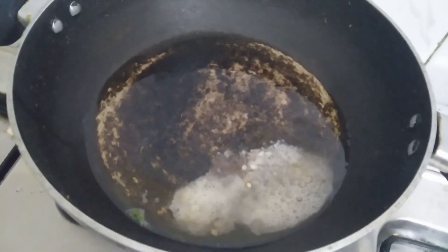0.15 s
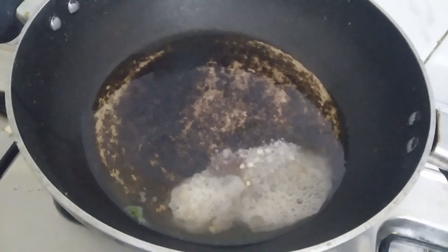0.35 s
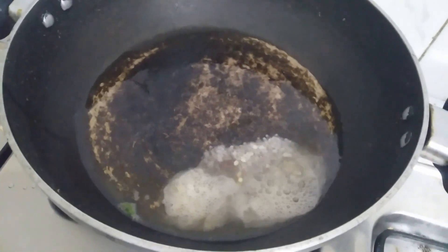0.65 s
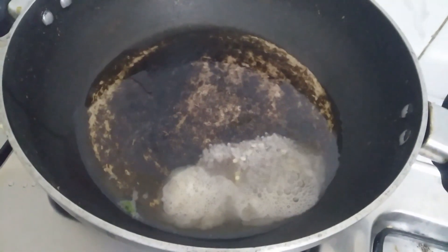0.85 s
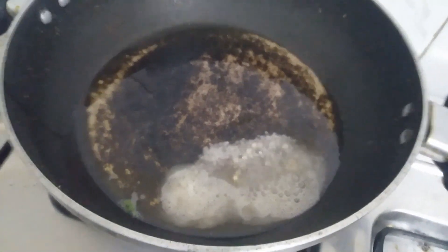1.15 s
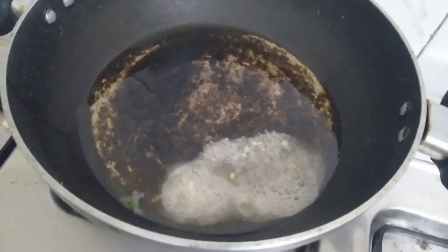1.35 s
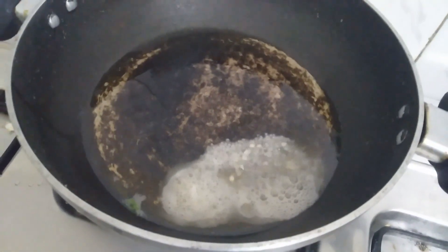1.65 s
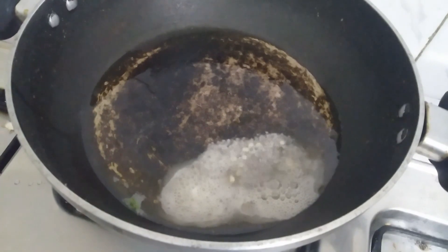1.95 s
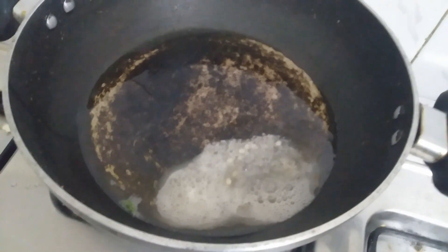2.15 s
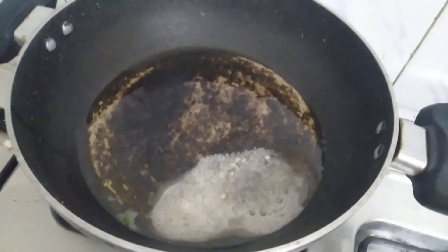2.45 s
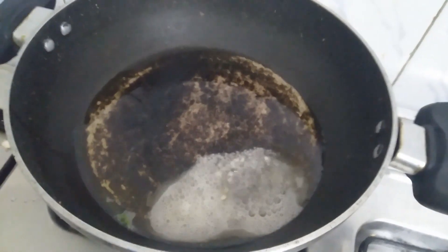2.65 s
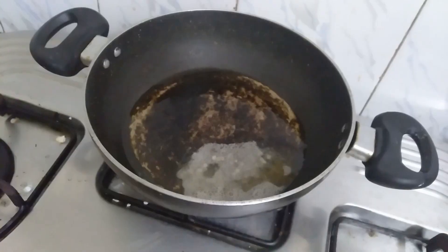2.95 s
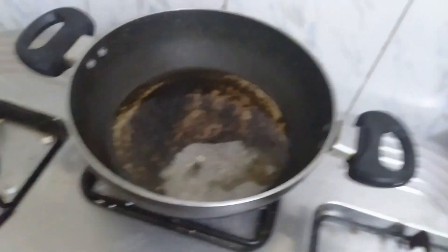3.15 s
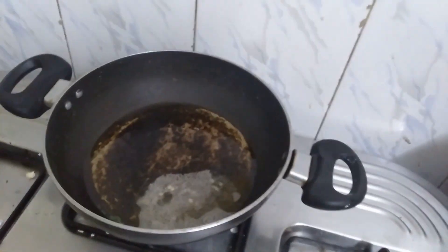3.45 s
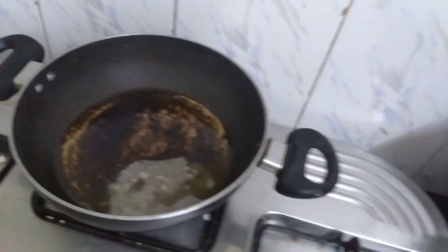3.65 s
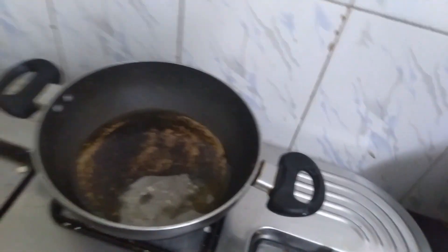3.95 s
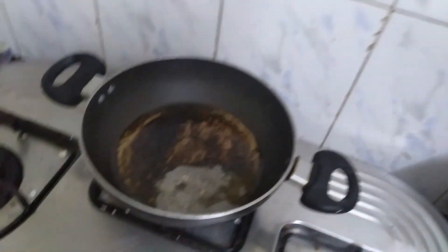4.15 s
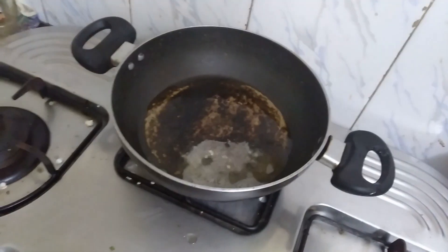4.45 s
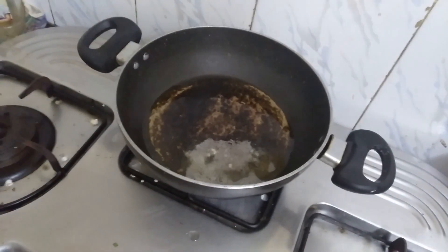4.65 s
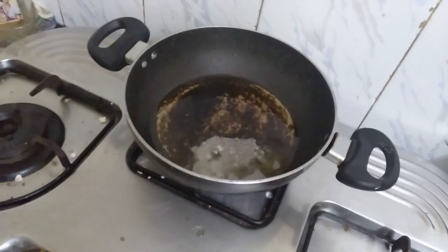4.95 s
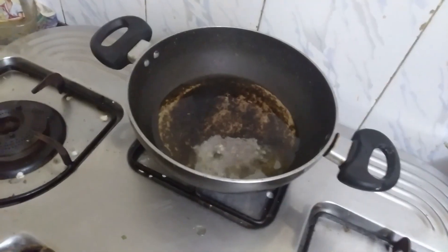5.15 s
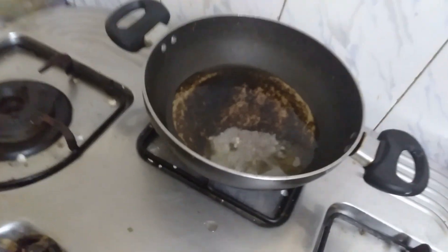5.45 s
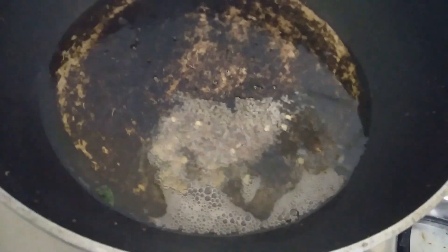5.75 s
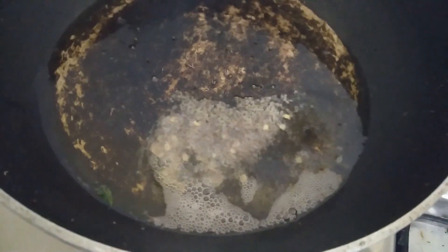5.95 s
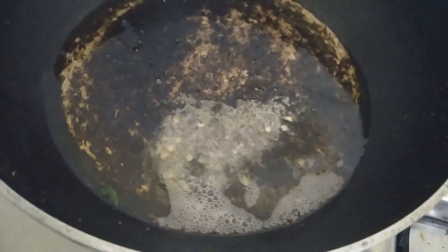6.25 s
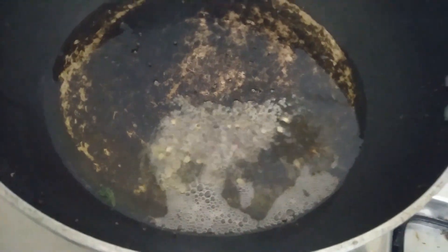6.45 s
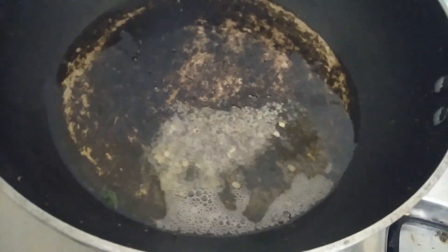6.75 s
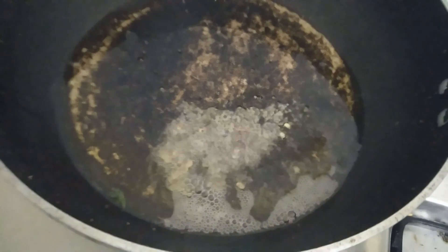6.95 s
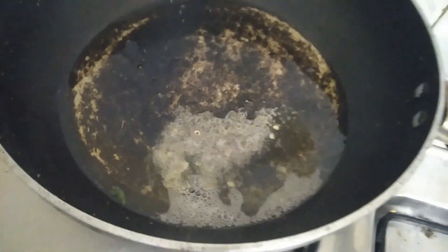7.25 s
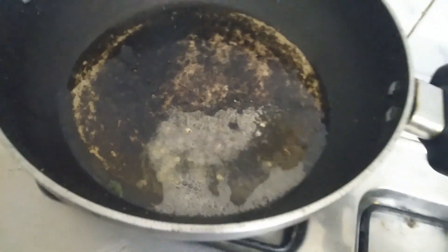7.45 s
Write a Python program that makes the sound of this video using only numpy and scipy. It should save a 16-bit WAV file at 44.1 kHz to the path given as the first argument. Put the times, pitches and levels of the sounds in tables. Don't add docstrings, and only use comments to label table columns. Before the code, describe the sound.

Woody spoon clatter with steely ticks, a stumbling scrape, then mustard seeds popping faster and faster in frying oil in a small kitchen.

```python
import sys
import numpy as np
from scipy import signal
from scipy.fft import rfft, irfft, next_fast_len
from scipy.io import wavfile
from scipy.ndimage import minimum_filter1d

SR = 44100
rng = np.random.default_rng(int(sys.argv[2]) if len(sys.argv) > 2 else 0)


def dump(signal):
    limited = np.clip(np.atleast_2d(signal).T, -1, 1)
    pcm = np.round(limited * 32767).astype(np.int16)
    wavfile.write(sys.argv[1], SR, pcm)


N = 334719

# pitch in Hz, level in dB per Hz.
HUM_COLOUR = [(15, -71), (25, -46.5), (59, -20.5), (72, -18), (87, 5), (146, -2), (190, 10), (260, -8.5),
              (340, -44.5), (570, -120)]
# pitch in Hz, level in dB per Hz.
AIR_COLOUR = [(150, -22.5), (260, -0.5), (368, -3.5), (557, -2), (614, -8), (700, -0.5), (780, -1.5),
              (1230, -6.5), (3500, -19), (4550, -63), (7700, -120)]
# pitch in Hz, level in dB per Hz.
FRY_COLOUR = [(2060, -50.5), (3500, -15.5), (4490, -7.5), (6810, -8), (8050, -13.5), (8800, -19),
              (10800, -19.5), (12700, -21.5), (13000, -46)]
# time in seconds, level in dB.
GATE_LEAK = [(0.0, 10), (0.15, 9.5), (0.57, -2), (1.52, 0.5), (1.75, 11), (2.09, 3), (2.6, 0.5), (2.9, -2),
             (3.93, -5), (4.23, -4.5), (4.6, 16.5), (5.05, -4), (5.28, -2), (5.54, 8), (5.74, -6.5),
             (6.5, 1), (6.8, -6), (7.59, 4.5)]
# time in seconds, level in dB.
FLAME_SWELL = [(0, 5.5), (0.9, 0.5), (1.1, 2), (2.0, -3.5), (2.4, 0), (3.7, -5), (4.2, -2), (5.0, 2.5),
               (5.45, 2), (5.75, -4), (6.0, 1), (7.0, -3), (7.25, 3), (7.59, 4.5)]
# start in seconds, end in seconds,
# pitch in Hz, width in Hz, level in dB.
NARROW_SOUNDS = [(.68, 1.14, 3290, 40, -72), (1.38, 1.66, 2890, 60, -65), (.94, 1.04, 800, 600, -52),
                 (1.12, 1.2, 900, 800, -48), (5.28, 5.58, 85, 20, -59), (3.93, 4.0, 170, 80, -59),
                 (.35, .95, 80, 25, -65), (.28, .31, 5750, 200, -50), (.42, .47, 5800, 200, -33),
                 (2.34, 2.4, 13900, 500, -58), (4.2, 4.31, 2030, 85, -40), (2.87, 2.98, 1880, 60, -69),
                 (3.22, 3.41, 1235, 50, -66), (3.32, 3.47, 1450, 40, -68), (3.33, 3.47, 1770, 60, -70),
                 (2.35, 2.41, 4500, 150, -52), (2.77, 2.83, 4550, 150, -52), (2.86, 2.97, 1260, 40, -64),
                 (4.085, 4.13, 6300, 900, -47), (5.44, 5.62, 760, 30, -51), (5.31, 5.4, 1520, 60, -55),
                 (.625, .68, 13900, 500, -64), (.75, .79, 14000, 400, -65), (4.93, 4.995, 1060, 85, -30),
                 (4.76, 4.88, 1300, 90, -33)]
HUM_DB, AIR_DB, FRY_DB = -57.5, -56.5, -61.5
HUM_FOLLOWS, AIR_FOLLOWS, FRY_FOLLOWS = 0.53, 0.79, 1.1

# time in seconds, pressure as body dB, speed as grit dB.
DRAGS = [
    [(4.16, -69, -60), (4.198, -32.5, -34.5), (4.38, -25.5, -30), (4.522, -45, -52.5), (4.558, -37, -56.5),
     (4.838, -19, -22.5), (4.93, -21.5, -26.5), (5.06, -52, -54.5)],
    [(5.28, -57, -83), (5.315, -56, -55), (5.424, -55, -38), (5.508, -59, -40.5), (5.668, -58, -71.5),
     (5.7, -87, -48.5)],
]
# pitch in Hz, width in Hz, level in dB.
DRAG_BODY = [(330, 19, 2.5), (535.5, 13, 1), (835, 180, -5), (1076, 90, -9.5), (1300, 140, -3),
             (2042, 190, -3.5), (2657, 130, -2)]
# pitch in Hz, level in dB per Hz.
GRIT_COLOUR = [(710, -56.5), (1200, -39), (1680, -7), (2160, -33), (3400, 0), (6860, -9.5), (8240, -30),
               (12000, -24.5), (15600, -43.5), (22000, -120)]
PATCHY_DB = 2.5

# time in seconds, peak in dB,
# body pitch in Hz, upper ring in dB against the body.
KNOCKS = [(0.017, -11.5, 522, 0), (0.035, -5.5, 512, -18), (0.051, -16, 510, -5.5), (0.065, -34, 430, -11),
          (0.088, 0.5, 714, -13.5), (0.121, -10.5, 708, -36), (0.141, -25.5, 730, -22.5),
          (0.161, -32, 700, -28), (0.189, -37, 518, -26), (0.287, -23, 741, 3.5), (0.311, -34, 620, 0.5),
          (0.423, -15, 848, 3), (0.44, -18, 892, -1), (1.134, -33.5, 620, -4.5), (1.15, -30.5, 694, -8),
          (1.165, -35.5, 672, -0.5), (1.532, -24, 476, -6.5), (1.572, -18, 530, -7.5),
          (1.585, -8.5, 477, -10.5), (1.604, -8.5, 473, -3.5), (1.63, -14, 330, -5.5),
          (1.692, -24, 470, -6), (1.713, -12, 546, -6), (1.728, -10.5, 632, -6), (1.748, -9, 510, -5),
          (1.766, -19, 580, -18), (1.791, -32, 624, -13), (2.315, -25, 538, -18), (2.329, -24.5, 595, -3.5),
          (2.349, -19, 592, -11), (2.424, -32.5, 276, -6.5), (2.65, -7, 671, -4.5), (2.664, -13, 580, 1),
          (2.684, -14, 683, -0.5), (2.712, -16, 576, -7.5),
          (4.206, -22.5, 554, -2), (4.22, -31.5, 545, 5), (4.253, -32.5, 507, 6), (4.281, -27, 562, -4.5),
            (4.313, -14.5, 560, -12.5), (4.338, -23.5, 590, -14.5), (4.363, -25.5, 493, -18),
            (4.379, -15, 518, -1.5), (4.399, -17, 564, -2.5), (4.488, -23, 590, -13), (4.511, -30, 634, -6),
            (4.563, -20.5, 549, -17.5), (4.601, -12, 542, -14), (4.614, -18.5, 617, -13.5),
            (4.628, -24.5, 540, 0), (4.682, -19, 551, 5.5), (4.71, -17, 574, -4), (4.735, -10.5, 669, -2),
            (4.771, -9, 599, -5.5), (4.816, -20.5, 590, 9), (4.832, -19, 663, -8), (4.85, -17, 636, -4.5),
            (4.882, -9, 381, -20.5), (4.931, -6.5, 593, 0), (4.961, -18.5, 401, -14.5),
            (5.008, -35, 463, -18), (5.023, -34, 456, -18.5), (5.285, -34, 306, -5.5),
            (5.308, -35.5, 630, 11.5), (5.351, -41.5, 308, -1), (5.415, -20, 755, -2),
            (5.476, -39, 796, -19),
          (0.1045, -11, 714, -38), (0.278, -28, 755, -1.5), (0.412, -21.5, 845, 6.5),
           (0.956, -37.5, 715, -7), (1.01, -41, 607, -8), (1.615, -18.5, 516, -1.5),
           (2.641, -23.5, 596, -3), (2.727, -28, 702, -9.5), (4.195, -36.5, 528, -11),
           (4.543, -23, 532, -8), (4.806, -19, 614, 3.5), (4.904, -17.5, 423, -7), (4.925, -6.5, 641, -22),
           (4.937, -5.5, 418, -21), (5.324, -46, 634, -10), (5.436, -32.5, 330, 4)]
# ratio to the body pitch, level in dB.
SPOON_MODES = [(0.679, -15.5), (0.852, -15.5), (1.0, 3), (1.089, -2.5), (1.301, -9), (1.55, -15)]
# time in seconds, left over right in dB.
SPOON_SIDE = [(0, -1.5), (1.6, -6), (1.76, -9.5), (2.3, -7), (4.2, -1), (4.4, 7.5), (4.82, 1), (4.95, 1),
              (5.4, -16)]
# time in seconds, level in dB.
WORKTOP_BOOM = [(0, -32.5), (1.3, -25), (1.6, -13.5), (1.75, -8), (2.35, -10), (2.68, -13.5), (4.2, -15),
                (4.8, -27), (5.0, -21.5), (5.45, -12.5)]
FREE_T60_S, CHOKED_T60_S = 0.13, 0.095
CHOKE_S = 0.045
DAMP_DB_S = 550.0
RISE_S, DRAG_RISE_S = 0.0019, 0.007

# time in seconds, crack in dB, thump in dB, clatter let through in dB.
STEEL_TICKS = [(0.016, -17, -17, -25.5), (0.0375, -30.5, -20, -53.5), (0.083, -14.5, -52.5, -20),
               (0.114, -14.5, -45, -21.5), (0.168, -35.5, -53.5, -40), (0.278, -42.5, -31, -40.5),
               (0.4136, -30.5, -10, -19), (0.59, -63.5, -88, -56), (0.629, -45, -91.5, -50.5),
               (0.758, -51, -88.5, -55), (1.134, -64.5, -40, -47.5), (1.583, -52, -21, -29.5),
               (1.6037, -30, -37, -17), (1.712, -24.5, -41, -20), (1.7258, -52, -7, -15),
               (2.319, -44.5, -57, -62.5), (2.3346, -44, -28, -36.5), (2.3574, -43, -42, -34.5),
               (2.6428, -31, -30.5, -22.5), (2.658, -7, -21, -14), (2.767, -45.5, -107, -42.5),
               (1.752, -21.5, -26, -15.5)]
# time in seconds, crack in dB,
# thump in dB, sizzle let through in dB.
FIRST_POPS = [(3.0666, -31, -41, -21), (3.09, -13, -73, -14), (3.326, -42, -27, -30),
              (3.8088, -37, -62, -50.5), (3.937, -30.5, -84.5, -29), (4.094, -30, -65.5, -48.5),
              (4.196, -45, -17, -16.5), (4.274, -14, -34, -17.5), (4.4647, 6, 8, -11.5),
              (4.606, -2.5, -28, -11.5), (4.652, -1.5, 4.5, -13), (4.807, 2.5, -16, -10),
              (4.9227, -12, -9, -23.5), (4.9975, -20, -29.5, -54), (5.1565, -11, -24, -24.5),
              (5.308, -36, -31, -47.5), (5.41, -44.5, -55.5, -57), (5.417, -30, -8.5, -54),
              (5.5695, -7, -76, -25), (5.634, -21.5, -82, -10.5), (5.6612, 9.5, 6, -15),
              (5.88, -14, -35, -38), (5.9158, -12, -34, -31), (5.9425, -10, -17.5, -24),
              (5.9713, -10.5, -31, -51.5), (5.986, -5.5, -21, -22), (6.013, -14, -26, -59),
              (6.075, -36.5, -45, -50)]
# time in seconds, crack in dB, thump in dB, sizzle let through in dB.
FULL_POPS = [(6.0997, -47, -37, -46), (6.1298, 2.5, 12, -14.5), (6.179, -4.5, -10, -18.5),
             (6.1873, -4, -31, -17.5), (6.286, -11, -34, -27), (6.3123, 0, -15, -15.5),
             (6.3555, -5.5, -33, -25), (6.368, -17, -25, -40.5), (6.4125, -10.5, -32, -27.5),
             (6.4229, -3, -16, -14), (6.4263, 0, -25, -14), (6.5957, -6, -19, -14.5),
             (7.017, -9, -24, -20.5), (6.5188, -9, -32, -21.5), (6.538, 1.5, -16.5, -17.5),
             (6.587, -19, -14, -12), (6.591, 0.5, -0.5, -27.5), (6.651, -5, -21, -18.5),
             (6.659, -2, -8, -41), (6.7275, -6.5, -27, -27.5), (6.737, -21.5, -28, -36),
             (7.009, 5, -12, -21.5), (7.03, -6, -6, -14.5), (7.058, -1.5, -21, -20),
             (7.131, -6, -14.5, -20), (7.1484, 1.5, 5.5, -14), (7.2163, -13, -22, -19.5),
             (7.229, -6, 3, -19.5), (7.34, -3, -10.5, -19.5), (7.353, -14, -18, -22),
             (7.443, -10.5, -27, -27), (7.4677, -13, -38, -47), (7.485, -13.5, -27, -45.5),
             (7.499, 2.5, 10, -17), (7.5356, -10, 1.5, -13.5)]
# time in seconds, left over right in dB.
PAN_SIDE = [(0, -7.5), (2.8, -8), (3.3, 7), (4.0, -3), (4.3, 3.5), (4.9, 3.5), (5.4, 0.5), (6.4, -1.5),
            (7.59, 0.5)]
# pitch in Hz, level in dB per Hz.
SIZZLE_COLOUR = [(59, -42.5), (100, -8), (1490, -6), (2140, -3.5), (3010, 2.5), (3570, -2.5), (4710, 5),
                 (6900, 5), (7520, 5.5), (8180, -1.5), (12500, -3), (13600, -9), (15200, -2), (16200, -41)]
# pitch in Hz, level in dB per Hz.
CLATTER_COLOUR = [(530, -19.5), (900, -4), (1220, -20), (1650, -7.5), (2120, -14.5), (3610, -21.5),
                  (4130, -6.5), (5860, -6), (10200, -19.5), (14300, -20), (16200, -35)]
# time in seconds, level in dB.
STEEL_RUB = [(1.46, -75.5), (1.512, -49.5), (1.564, -46.5), (1.6, -26), (1.634, -21.5), (1.656, -33.5),
             (1.706, -31), (1.751, -21), (1.818, -35.5), (1.892, -49), (1.93, -80)]
# time in seconds, treble in dB.
FACING = [(0, 2), (0.25, -0.5), (0.45, -19), (0.6, 9.5), (1.6, -0.5), (2.35, 2), (2.7, -2.5), (3.2, 2.5),
          (4.3, 2), (5.0, -4.5), (5.3, 1.5), (5.7, 0.5), (6.2, 3.5), (6.6, -1.5), (7.05, 2), (7.3, 0),
          (7.59, 4)]
CLATTER_END_S = 2.9
SPILL_DB_PER_DB = 0.4
UPPER_SWING = 0.83
HOLD_S = 0.059
FLURRY_HOLD_S, DRAG_HOLD_S = 0.0023, 0.04
FLURRY_GAP_S = 0.07

# pitch in Hz, likeness from -1 to 1.
LIKENESS = [(60, 0.89), (300, 0.85), (1000, 0.66), (3600, 0.25), (6000, 0.029), (15000, 0.26)]
# low edge in Hz, high edge in Hz, band width in Hz, share of
# time silent, last moment in seconds, 1 if the side signal falls silent too.
SILENT_REGIONS = [(2550, 2820, 350, .2, 5.3, 0), (2970, 3230, 350, .55, 4.1, 0),
                  (3350, 3800, 550, .95, 3.6, 0), (3250, 3800, 550, .1, 5.3, 0),
                  (5000, 8000, 300, .05, 7.6, 1), (8000, 8700, 700, .2, 7.6, 1),
                  (8700, 14200, 260, .33, 7.6, 1), (14200, 16600, 1200, .4, 7.6, 1)]
# start in seconds, end in seconds.
DROPOUTS = [(3.6, 3.64), (3.72, 3.75), (4.0, 4.18), (4.21, 4.26), (4.29, 4.33), (4.42, 4.45), (4.48, 4.6),
            (4.665, 4.8), (4.83, 4.91), (4.97, 4.99), (5.18, 5.27)]
LAG_S = 6 / SR
TOP_LEFT_DB = 6.5
WARBLE_DB = 3.0


def from_db(db):
    return 10 ** (np.asarray(db) / 20)


def rms_one(x):
    return x / np.sqrt(np.mean(x ** 2) + 1e-20)


def in_time(rows):
    s, *columns = np.transpose(rows)
    return [np.interp(np.arange(N) / SR, s, c) for c in columns]


def at_times(rows, s):
    return np.interp(s, *np.transpose(rows))


def sides(pan_db):
    return from_db(np.array([pan_db, -pan_db]) / 2)


def lagged(pair, late):
    out = pair.copy()
    out[late] = np.roll(pair[late], round(LAG_S * SR))
    return out


def add(out, s, sound):
    i = round(s * SR)
    out[:, i:i + sound.shape[1]] += sound[:, :N - i]


def band(x, low_hz, high_hz):
    return signal.sosfilt(signal.butter(2, [low_hz, min(high_hz, .45 * SR)], "band", fs=SR, output="sos"), x)


def ring(x, hz, width_hz):
    r = np.exp(-np.pi * width_hz / SR)
    w = 2 * np.pi * hz / SR
    return signal.lfilter([0, np.sin(w)], [1, -2 * r * np.cos(w), r * r], x)


def grains(per_s, spread_db):
    sizes = from_db(spread_db * np.minimum(rng.exponential(1, (2, N)), 4)) * rng.standard_normal((2, N))
    return sizes * (rng.random((2, N)) < per_s / SR)


def drift(rate):
    steps = rng.standard_normal(int(N / SR * rate) + 2)
    return np.interp(np.arange(N) * rate / SR, np.arange(len(steps)), steps)


def coloured(pair, spectrum, lag_s):
    size = next_fast_len(N)
    hz = np.arange(size // 2 + 1) * SR / size + 1

    def at(points):
        point_hz, value = np.transpose(points)
        return np.interp(np.log(hz), np.log(point_hz), value)

    alike = np.clip(at(LIKENESS), -1, 1)
    mid, side = rfft(pair, size) * from_db(at(spectrum)) * np.sqrt([1 + alike, 1 - alike])
    right = (mid - side) * np.exp(-2j * np.pi * hz * lag_s)
    return rms_one(irfft([mid + side, right], size)[:, :N])


def narrow_sounds(out):
    t = np.arange(N) / SR
    air = rng.standard_normal(N)
    for start, end, hz, width, level_db in NARROW_SOUNDS:
        on = (t > start) & (t < end)
        tone = 0.7 * rms_one(ring(ring(air[on], hz, width), hz, width))
        tone = tone + (width < 80) * np.sin(2 * np.pi * hz * t[on])
        fade = np.clip(np.minimum(t[on] - start, end - t[on]) / 0.015, 0, 1)
        out[:, on] += from_db(level_db) * fade * tone


def kitchen():
    leak_db, = in_time(GATE_LEAK)
    flame_db, = in_time(FLAME_SWELL)
    hum = coloured(rng.standard_normal((2, N)), HUM_COLOUR, 0)
    air = coloured(rng.standard_normal((2, N)), AIR_COLOUR, 0)
    fry = coloured(grains(per_s=25000.0, spread_db=3.5), FRY_COLOUR, LAG_S)
    out = from_db(HUM_DB + HUM_FOLLOWS * leak_db + flame_db) * hum
    out += from_db(AIR_DB + AIR_FOLLOWS * leak_db) * air
    out += from_db(FRY_DB + FRY_FOLLOWS * leak_db) * fry
    narrow_sounds(out)
    return out


def drags():
    shared, unshared = grains(per_s=2500.0, spread_db=1.0)
    slips = shared + .3 * unshared * np.array([[1], [-1]])
    body = 0
    for hz, width, db in DRAG_BODY:
        patchy = from_db(db + PATCHY_DB * drift(28))
        body = body + patchy * np.sqrt(width) * ring(slips, hz, width)
    body = rms_one(lagged(band(body, 510, 3700), late=0))
    grit = coloured(grains(per_s=9000., spread_db=1.6), GRIT_COLOUR, LAG_S) * from_db(2.5 * drift(40))
    spoon_side = sides(*in_time(SPOON_SIDE))
    out, t = 0, np.arange(N) / SR
    for rows in DRAGS:
        body_db, grit_db = in_time(rows)
        touching = (t > rows[0][0]) & (t < rows[-1][0])
        out = out + touching * spoon_side * (from_db(body_db) * body + from_db(grit_db) * grit)
    return out


def blows_of_spoon():
    s, peak_db, hz, upper_db = np.transpose(sorted(KNOCKS))
    gap_s = np.diff(s, append=N / SR)
    t60 = np.where(gap_s < CHOKE_S, CHOKED_T60_S, FREE_T60_S)
    return zip(s, peak_db, hz, t60, upper_db, at_times(SPOON_SIDE, s), at_times(WORKTOP_BOOM, s), gap_s)


def knocks(bounce_per_s, width_hz, hold_s, contact_s):
    out, t = np.zeros((2, N)), np.arange(6500) / SR
    contact = np.hanning(round(contact_s * SR) + 3)
    past_hold = np.maximum(0, t - hold_s)
    for s, peak_db, hz, t60, upper_db, pan_db, boom_db, gap_s in blows_of_spoon():
        dragged = DRAGS[0][0][0] < s < DRAGS[0][-2][0] - .02
        rise_s = DRAG_RISE_S if dragged else RISE_S
        rise = 1 - np.exp(-(t / rise_s) ** 2)
        fade = from_db(-60 * t / max(t60, .02) - 380 * past_hold)
        shared, *own = rng.standard_normal((3, len(t)))
        own = np.array(own)

        chatter = (shared + 0.39 * own) * (rng.random(len(t)) < bounce_per_s / SR)
        blows = signal.lfilter(contact, 1, ((t == 0) + 0.27 * chatter) * fade)
        body = sum(from_db(db) * ring(blows, ratio * hz, width_hz) for ratio, db in SPOON_MODES)
        boom = band(ring(blows, 179.6, 12), 166, 370)
        boom = boom + 1.86 * band(ring(blows, 335, 40.8), 253.8, 690)
        body = band(body, 0.74 * hz, 2.14 * hz) + from_db(boom_db) * boom
        body = body * from_db(-600 * past_hold - DAMP_DB_S * np.maximum(0, t - gap_s)) * rise

        rattle = band((shared + 0.32 * own) * fade * rise, 1300, 2880)
        rattle += 0.032 * ring(rattle, 1744, 320)
        sound = body / np.abs(body).max() + from_db(upper_db) * rattle / np.abs(rattle).max()
        sound = from_db(peak_db) * sides(pan_db)[:, None] * lagged(sound, late=1)
        add(out, s - (rise_s - RISE_S), sound)
    return out


def bursts():
    s, crack_db, thump_db, open_db = np.transpose(sorted([*STEEL_TICKS, *FIRST_POPS, *FULL_POPS]))
    pan_db = at_times(PAN_SIDE, s) + SPILL_DB_PER_DB * (open_db + 12.0)
    flurry = np.diff(s, append=N / SR) < FLURRY_GAP_S
    dragging = (s > DRAGS[0][0][0]) & (s < DRAGS[0][-3][0])
    hold_s = HOLD_S + FLURRY_HOLD_S * flurry + DRAG_HOLD_S * dragging
    return zip(s, crack_db, thump_db, pan_db, open_db, hold_s)


def sizzle(fade_db_s, shut_db_s, top_fade_db_s, tilt):
    level_db, pan, thin_db, age = np.full(N, -90.), np.zeros(N), np.zeros(N), np.zeros(N)
    t = np.arange(SR // 3) / SR
    for s, crack_db, thump_db, pan_db, open_db, hold_s in bursts():
        i = round(s * SR)
        spring_db = 5.4 * np.exp(-t / 0.015) - 15 * np.exp(-t / 0.00032)
        shut_db = shut_db_s * np.maximum(0, t - hold_s + 0.024)
        shape_db = open_db - 8.5 + spring_db - fade_db_s * t - shut_db
        level_db[i:i + len(t)] = np.maximum(level_db[i:i + len(t)], shape_db[:N - i])
        pan[i:i + SR] = 0.5 * pan_db
        age[i:i + len(t)] = t[:N - i]
        thin_db[i:i + SR] = np.clip(crack_db - thump_db - 41.5, -15, 15)

    oil = coloured(grains(per_s=14000., spread_db=1.5), SIZZLE_COLOUR, -LAG_S)
    clatter = coloured(grains(per_s=6900.0, spread_db=-8.5), CLATTER_COLOUR, LAG_S)
    oil = np.where(np.arange(N) < CLATTER_END_S * SR, clatter, oil)

    size = next_fast_len(N)
    hz, waves = np.arange(size // 2 + 1) * SR / size, rfft(oil, size)
    low = irfft(waves * (hz < 3000), size)[:, :N]
    top = irfft(waves * (hz > 8000), size)[:, :N]
    low_gain = from_db(0.5 - tilt * thin_db - 170 * age)
    top_db = 0.17 * thin_db + in_time(FACING)[0] + 0.5 - top_fade_db_s * age
    top_gain = sides(TOP_LEFT_DB)[:, None] * from_db(top_db)
    oil = oil + (low_gain - 1) * low + (top_gain - 1) * top

    rub_db, = in_time([(0.0044, -120), *STEEL_RUB, (STEEL_RUB[-1][0] + .01, -120)])
    return np.hypot(from_db(level_db), from_db(rub_db)) * sides(pan) * oil


def pops(crack_s, thump_hz):
    out, t = np.zeros((2, N)), np.arange(400) / SR
    swell = (t + 0.0022) / crack_s * np.exp(-(t / crack_s) ** 2)
    for s, crack_db, thump_db, pan_db, _, _ in bursts():
        shared, *own = rng.standard_normal((3, len(t))) * swell
        spray = shared + .8 * np.array(own)
        crack = band(band(spray, 3200, 8200), 2900, 8400) + from_db(-18) * band(spray, 8000, 16000)
        crack = crack / np.abs(crack).max(axis=1, keepdims=True)
        hz = thump_hz * rng.uniform(.95, 1.3)
        swing = ring(t == 0, hz, 1.2 * hz) + UPPER_SWING * ring(t == 0, 3000, 1300)
        thump = band(band(swing + .045 * spray, 300, 3600), 90, 4200)
        thump = thump / np.abs(thump).max(axis=1, keepdims=True)
        burst = from_db(crack_db - 4.0) * crack + from_db(thump_db - 3.5) * thump
        late = int(s < CLATTER_END_S)
        add(out, s - .0007, sides(pan_db)[:, None] * lagged(burst, late))
    return out


def scene():
    spoon = knocks(bounce_per_s=900., width_hz=31.5, hold_s=.07, contact_s=0.00089) + drags()
    puffs = sizzle(fade_db_s=129.5, shut_db_s=524.5, top_fade_db_s=30, tilt=0.17)
    return kitchen() + spoon + puffs + pops(crack_s=0.0013, thump_hz=1866)


def thin_bands(x):
    hz, s, cells = signal.stft(np.array([x[0] + x[1], x[0] - x[1]]) / 2, SR, nperseg=1024)
    power = np.sum(np.abs(cells[0, hz > 4000]) ** 2, axis=0)
    steady = minimum_filter1d(power < 3.5 * np.roll(power, 1), size=3)
    for low, high, width, share, until, side_too in SILENT_REGIONS:
        inside = (hz > low) & (hz < high)
        which = ((hz[inside] - low) // width).astype(int)
        muted = rng.random((2, which.max() + 1, len(s) // 3 + 1)) < share
        muted = np.repeat(muted, 3, axis=2)[:, which, :len(s)]
        muted = muted & steady & (s < until) & (s > .11)
        muted[1] &= bool(side_too)
        cells[:, inside] *= ~muted
    for start, end in DROPOUTS:
        cells[0, (hz > 3300) & (hz < 3800)] *= (s < start) | (s > end)
    wander = rng.standard_normal((2, len(hz) // 3 + 1, len(s) // 4 + 1))
    wander = wander.repeat(3, axis=1).repeat(4, axis=2)[:, :len(hz), :len(s)]
    cells *= from_db(WARBLE_DB * (wander - .35) * steady * (hz[:, None] > 900))
    mid, side = signal.istft(cells, SR, nperseg=1024)[1][:, :N]
    return np.array([mid + side, mid - side])


def top_cut(x):
    return signal.sosfilt(signal.butter(12, 15850, fs=SR, output="sos"), x)


def record(dry):
    heard = signal.sosfilt(signal.butter(1, 60, "high", fs=SR, output="sos"), dry)
    thinned = np.clip(thin_bands(heard), -1.1, 1.1)
    mix = signal.sosfilt(signal.butter(2, 45, "high", fs=SR, output="sos"), thinned)
    return top_cut(np.clip(mix, -1, 1))


dry = scene()
out = record(dry)
dump(out)
```